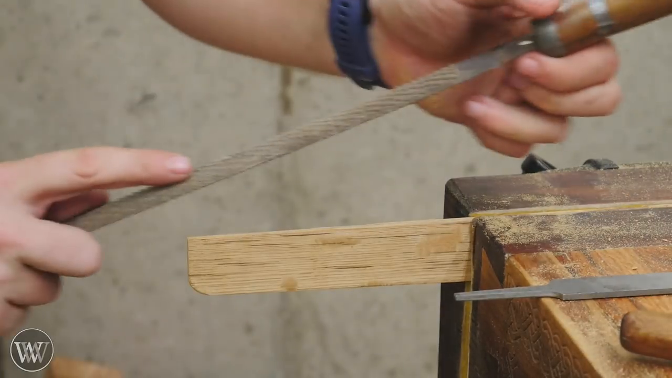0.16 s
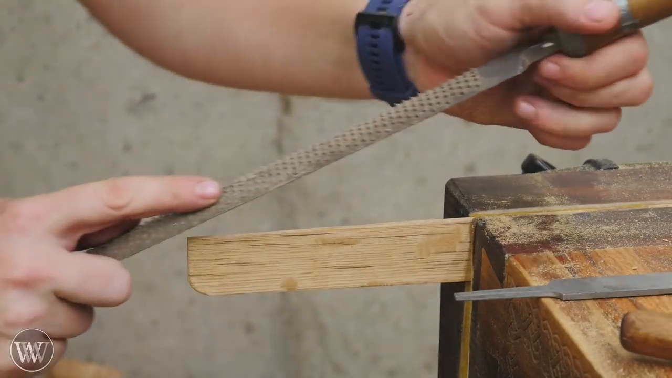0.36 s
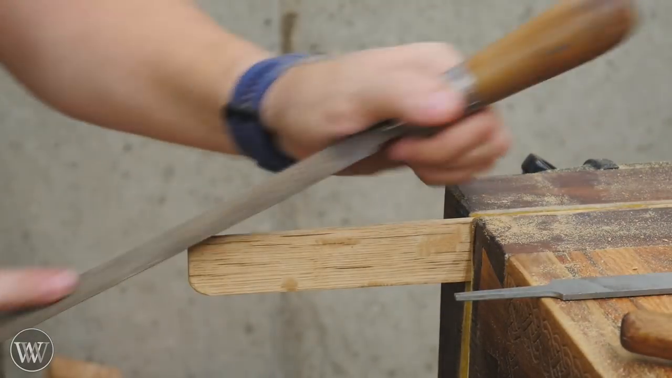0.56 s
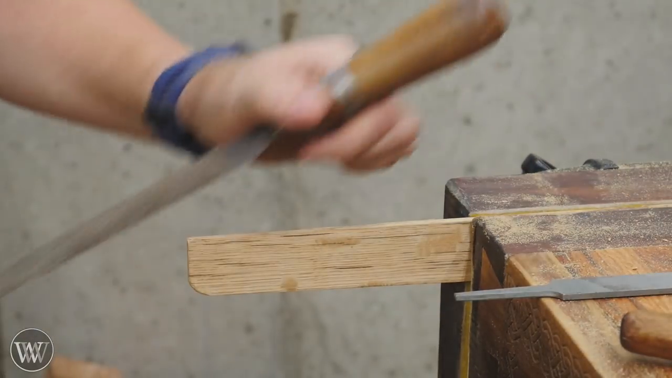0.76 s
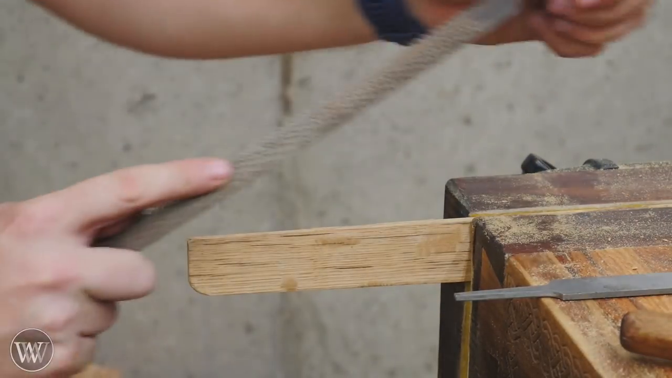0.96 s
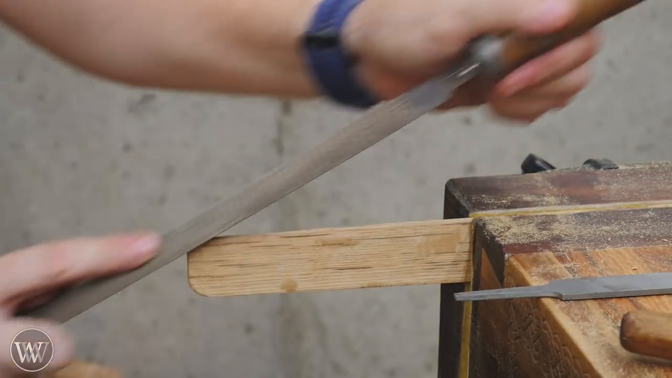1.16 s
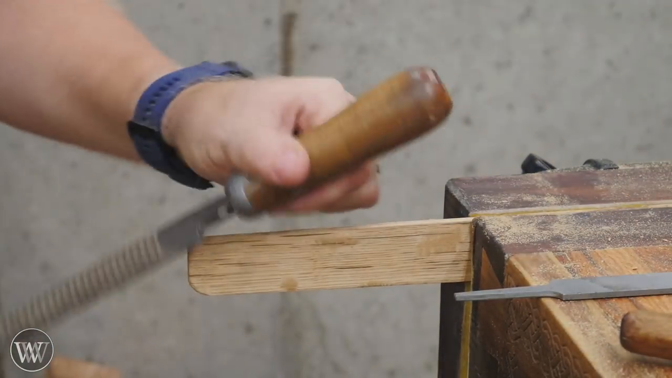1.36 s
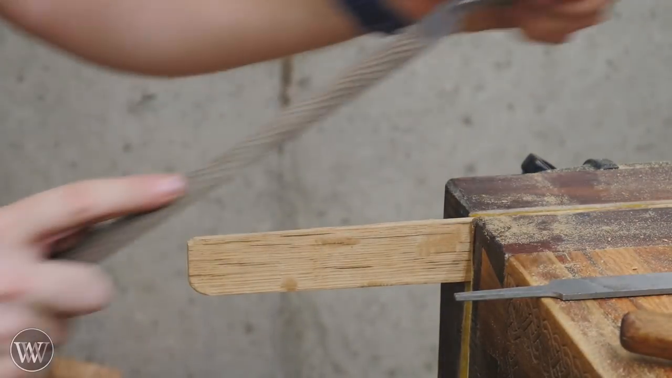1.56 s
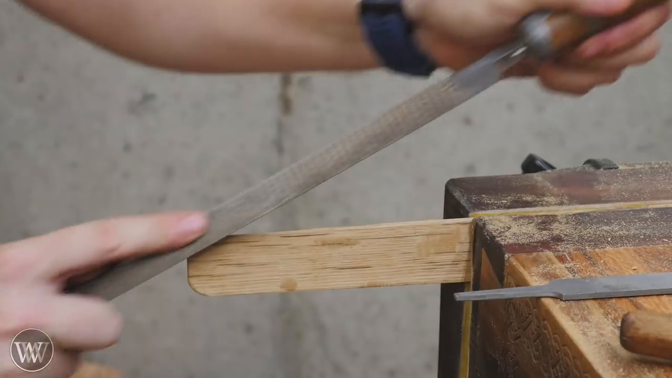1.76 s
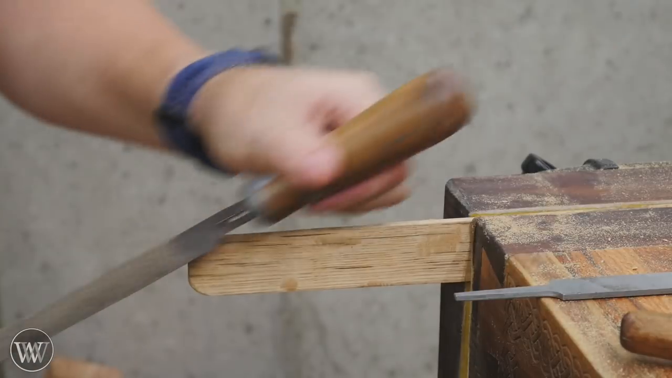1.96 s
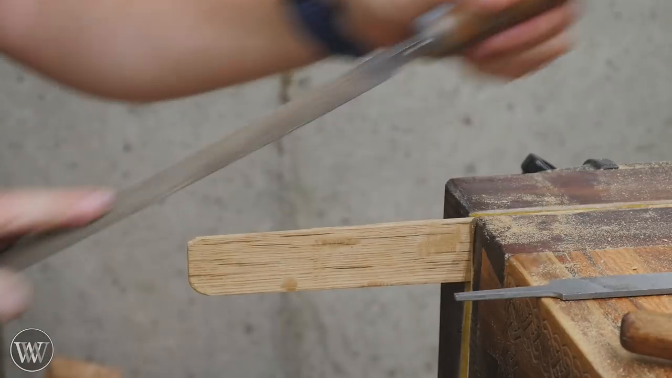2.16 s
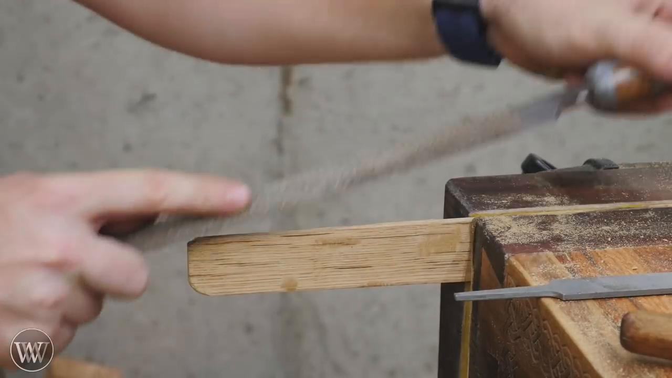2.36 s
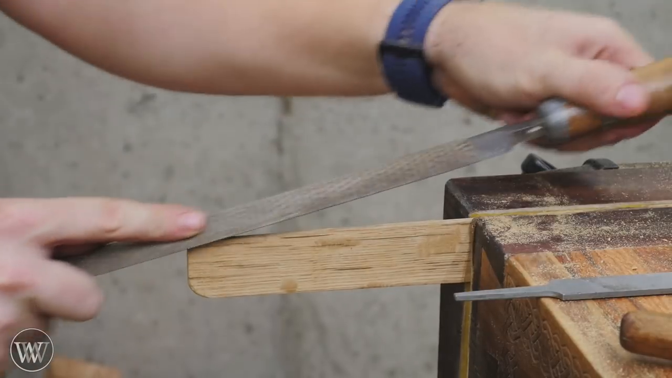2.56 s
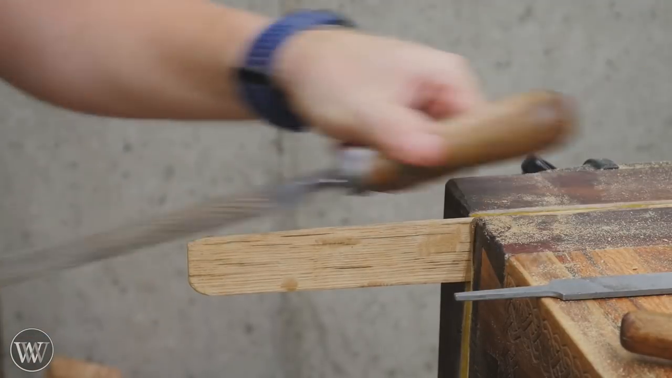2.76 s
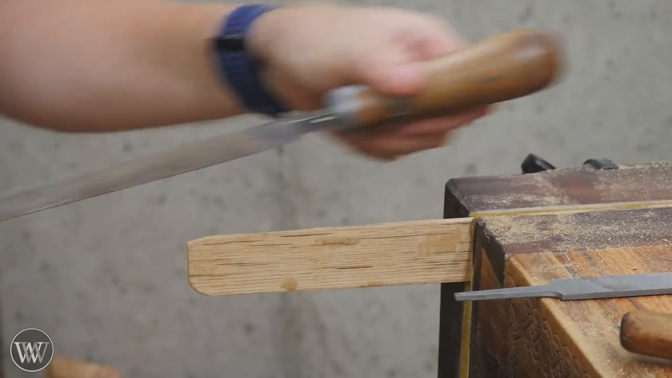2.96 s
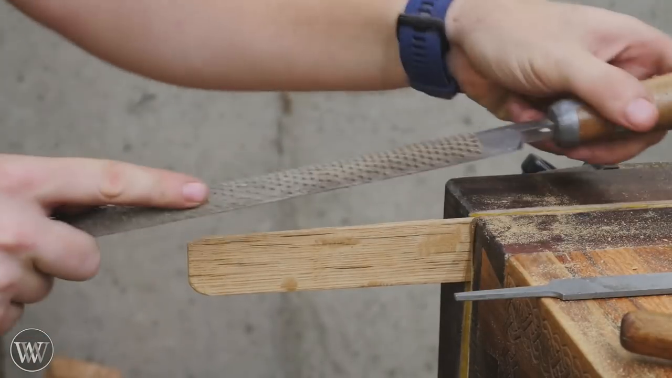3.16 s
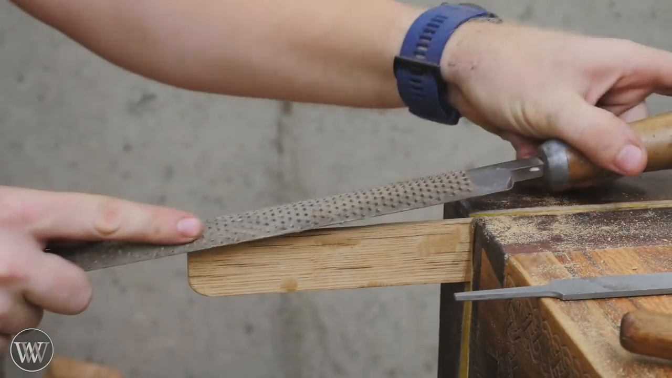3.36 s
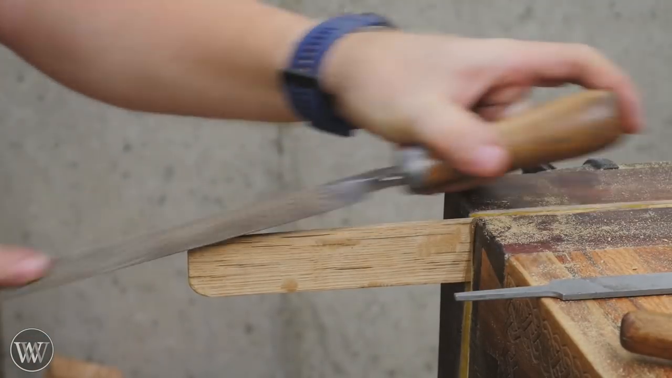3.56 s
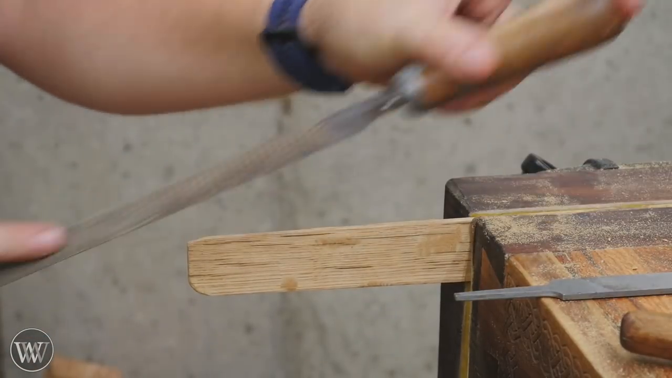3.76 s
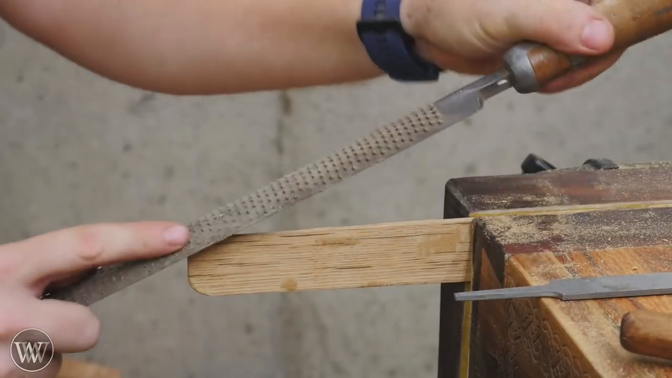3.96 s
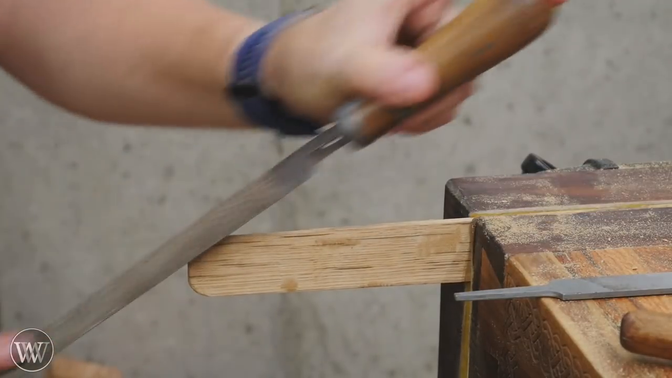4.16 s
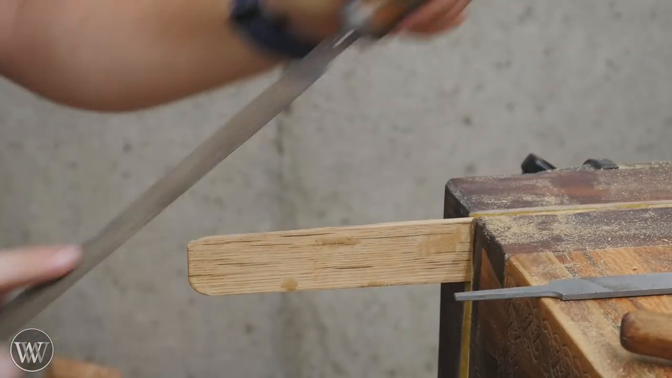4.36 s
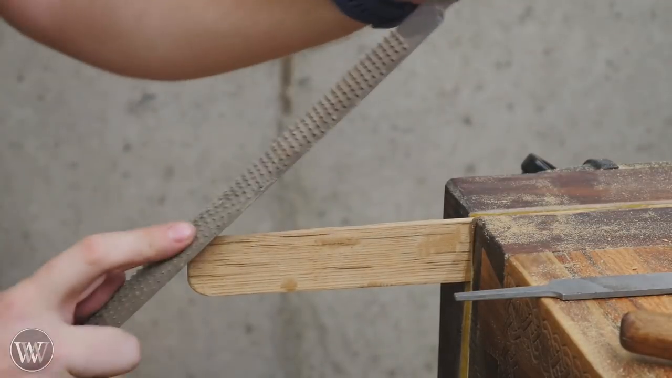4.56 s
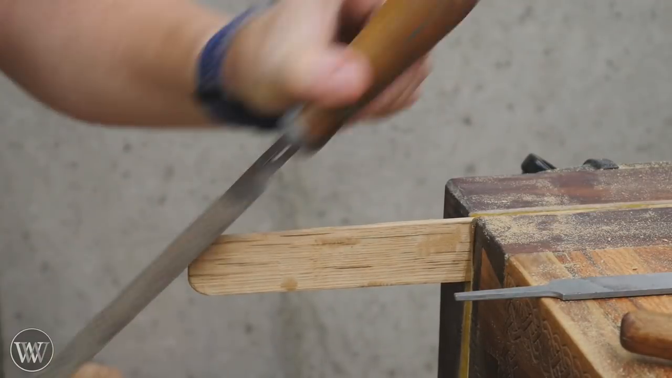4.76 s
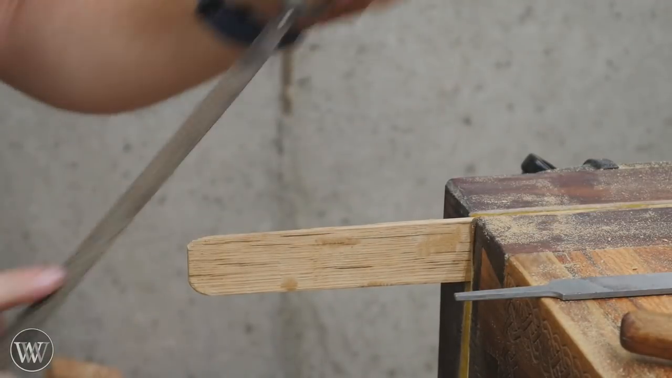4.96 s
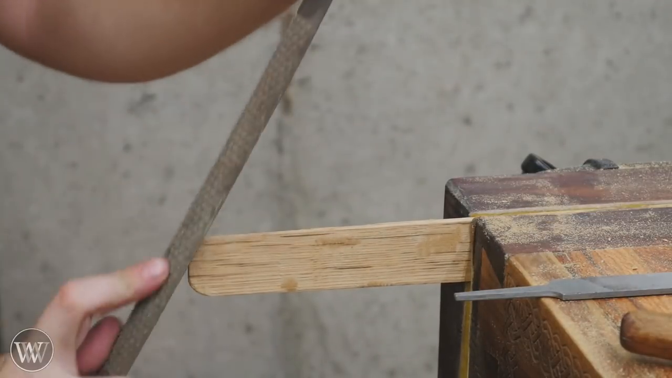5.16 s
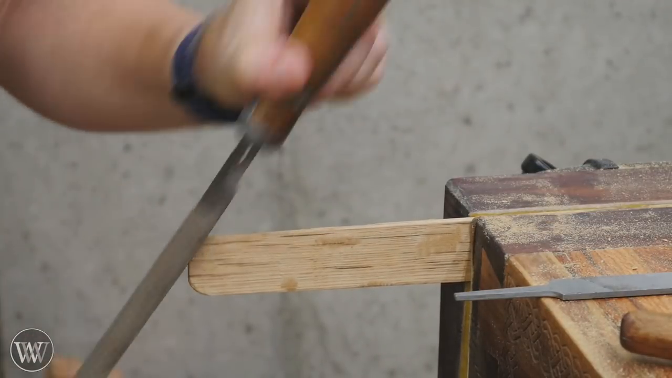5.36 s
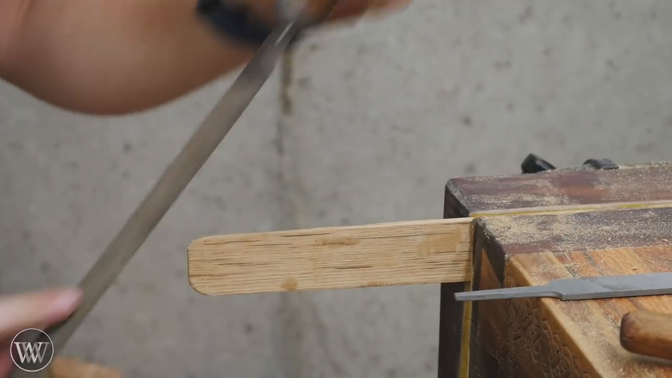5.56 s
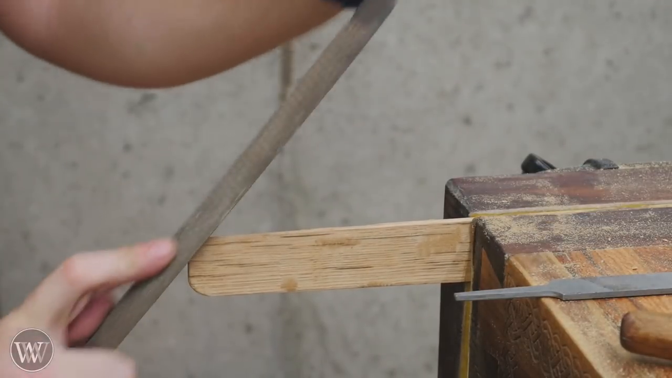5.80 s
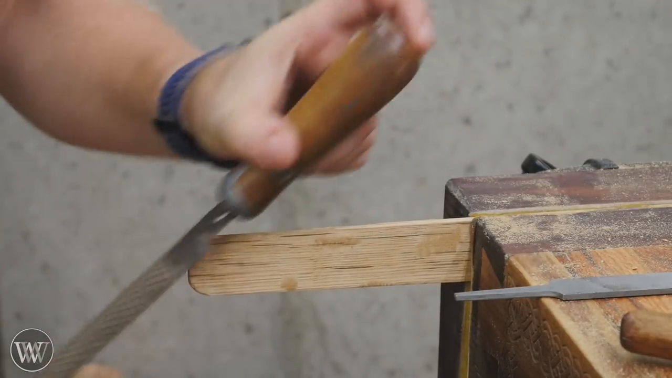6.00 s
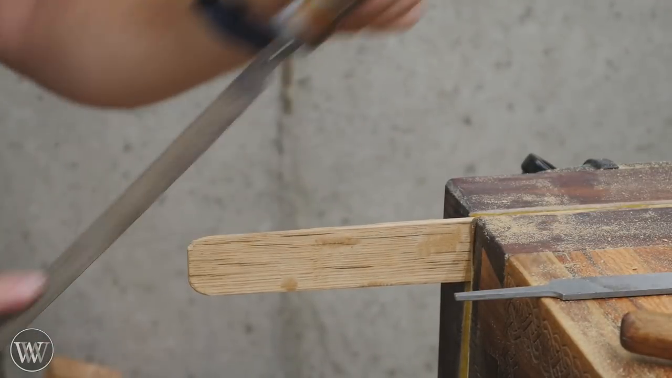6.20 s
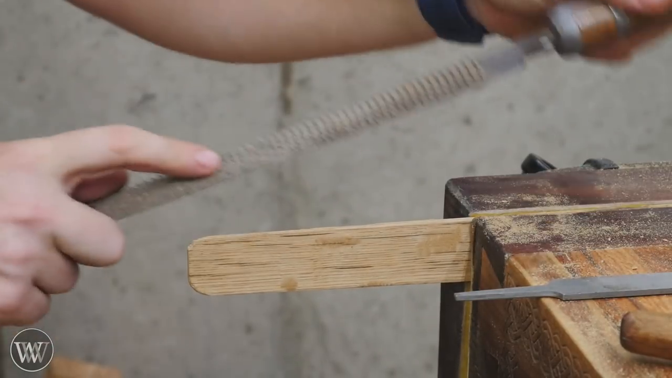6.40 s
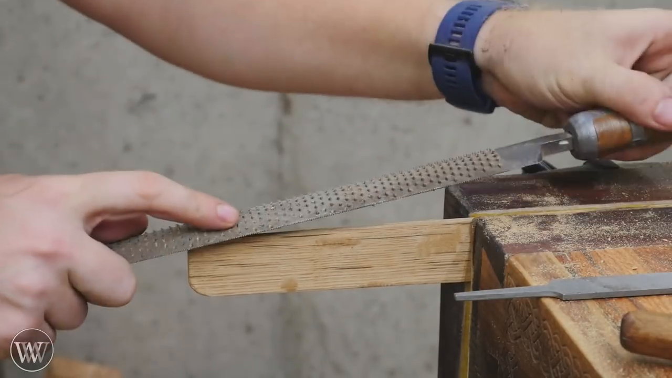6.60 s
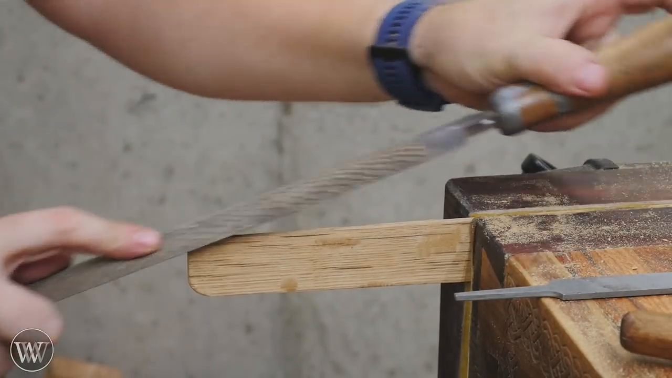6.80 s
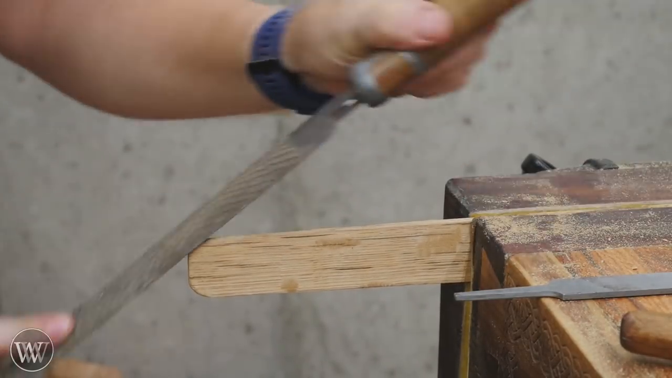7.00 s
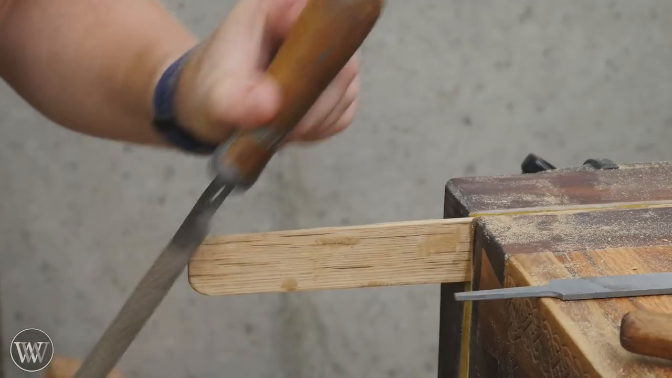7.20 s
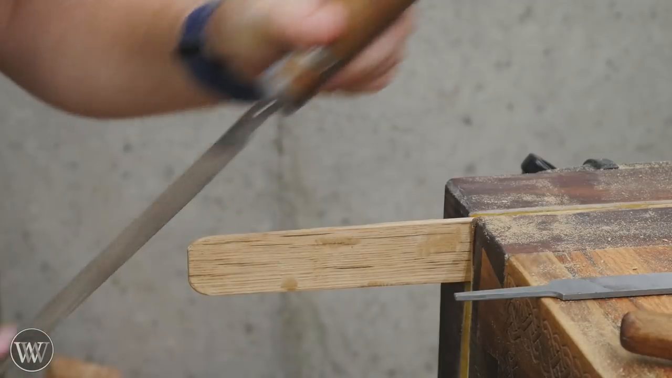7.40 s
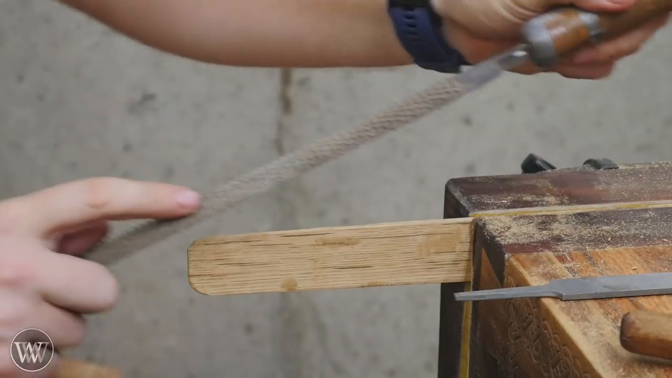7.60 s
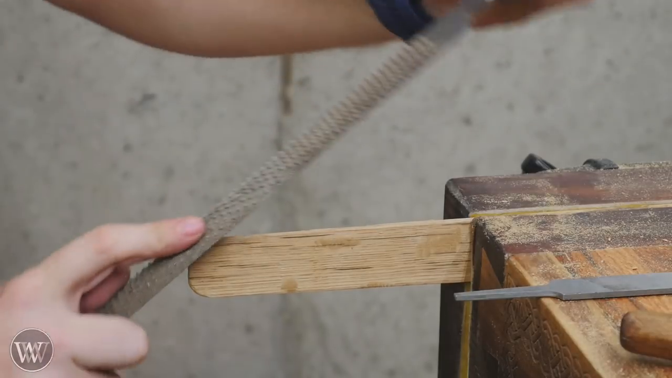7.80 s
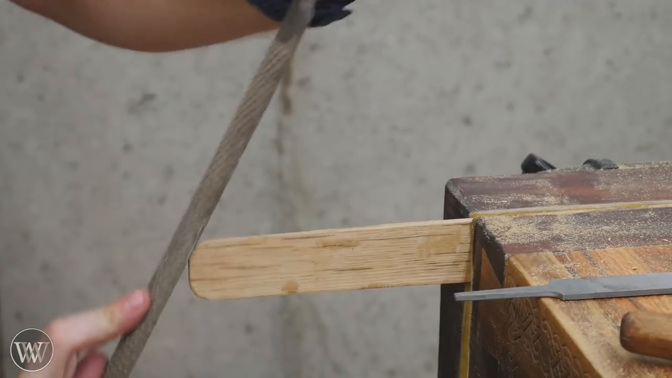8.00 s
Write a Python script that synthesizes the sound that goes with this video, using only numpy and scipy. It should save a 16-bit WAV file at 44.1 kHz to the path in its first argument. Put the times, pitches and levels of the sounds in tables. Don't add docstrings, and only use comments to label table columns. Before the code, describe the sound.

Close in a small workshop, coarse steel teeth grind over the end of a thin wood strip held to a bench. Strokes vary from faint scuffs to loud, knocking bites, most starting with a tap and several ending in a brief woody boing. Between them are soft hand slides, dull bench bumps and dry ticks over faint hiss and low rumble. A cloth brush on the microphone precedes the final rasp.

```python
import sys
import numpy as np
from scipy import signal
from scipy.fft import rfft, irfft, next_fast_len
from scipy.io import wavfile
from scipy.ndimage import uniform_filter1d, map_coordinates

SR = 44100
rng = np.random.default_rng(int(sys.argv[2]) if len(sys.argv) > 2 else 0)


def dump(signal):
    limited = np.clip(np.atleast_2d(signal).T, -1, 1)
    pcm = np.round(limited * 32767).astype(np.int16)
    wavfile.write(sys.argv[1], SR, pcm)


def how_loud(loudness_db):
    steps = np.asarray(loudness_db, float) / 20
    return 10 ** steps


N = 354637

STRIP, STEEL, BENCH, BENDING = range(4)


def unit(x):
    return x / np.sqrt(np.mean(x ** 2) + 1e-20)


def along(points, hz):
    f, v = np.transpose(points)
    return np.interp(np.log(hz + 1), np.log(f + 1), v)


def wobble(rate):
    knots = rng.standard_normal(int(N * rate / SR) + 4)
    return map_coordinates(knots, [np.arange(N) * rate / SR])


def swell(start, top, end, edge_db):
    t = np.arange(N) / SR
    return -edge_db * np.maximum((top - t) / (top - start), (t - top) / (end - top))


def filtered(x, response):
    m = next_fast_len(N + SR // 2)
    return irfft(rfft(x, m) * response(np.fft.rfftfreq(m, 1 / SR)), m)[..., :N]


def noise(spectrum):
    return unit(filtered(rng.standard_normal(N), lambda hz: how_loud(along(spectrum, hz))))


def body(modes):
    def ring(f):
        total = 0
        for k, (centre, width, db) in enumerate(modes):
            damping = 1j * f * width
            total = total + (-1) ** k * how_loud(db) * damping / (centre * centre - f * f + damping)
        return total

    scale = np.sqrt(np.mean(np.abs(ring(np.arange(1, SR // 2, 2))) ** 2))
    return lambda f: ring(f) / scale


def air():
    # frequency_hz, density_db
    hiss_spectrum = [(90, -8), (260, -16), (490, -14), (820, -28), (3200, -31), (13300, -34), (16000, -37)]
    # frequency_hz, density_db
    rumble_spectrum = [(18, -11), (34, -7.5), (52, 7.5), (80, -1.5), (110, -23), (200, -120)]
    # peak_s, peak_db, dying_s
    shudders = [(.02, -41, 0.093), (.55, -43.5, 0.38), (.8, -37, 0.1), (1.17, -37, 0.23), (1.9, -42, 0.17),
                (2.45, -49, .1), (2.64, -42, 0.17), (3.4, -47.5, 0.67), (4.2, -52, 0.18), (4.68, -45, .15),
                (5.27, -57, .3), (5.87, -50, .4), (6.922, -44, 0.42), (7.17, -42, 0.11), (7.57, -42, 0.28),
                (8.0, -42, .2)]
    rise = 0.564
    shake = sum(how_loud(db + swell(s - rise * dying, s, s + dying, edge_db=14.5)) for s, db, dying in shudders)
    rumble = (how_loud(-62) + shake) * how_loud(0.5 * wobble(6)) * noise(rumble_spectrum)
    return rumble + how_loud(-54 + wobble(3)) * noise([(60, -40), *hiss_spectrum])


def shop(x, count=14):
    # frequency_hz, t60_s
    decay = [(100, 0.089), (400, 0.46), (2000, 0.43), (5000, 0.45), (12000, 0.59)]
    hz, t, z = signal.stft(rng.standard_normal((count, int(.7 * SR))), SR, nperseg=256)
    tails = signal.istft(z * how_loud(-60 * t / along(decay, hz)[:, None]), SR, nperseg=256)[1]
    out, step = np.zeros(N + 2 * SR), N // count + 1
    for k, tail in enumerate(tails):
        echo = signal.fftconvolve(x[k * step:(k + 1) * step], tail / np.linalg.norm(tail))
        out[k * step + 300:][:len(echo)] += echo
    room_hz = 3800
    return filtered(out[:N], lambda f: 1 / (1 + 1j * f / room_hz))


def ticks():
    # start_s, peak_db, centre_hz, crack_db
    tick_events = [(0.8144, -32, 1370, -15), (0.8989, -41, 1790, -13), (0.9344, -40, 1550, -16),
                   (0.9594, -43, 2660, -15), (1.5924, -38, 1900, -19), (1.6432, -19, 1660, -16),
                   (2.2353, -27, 1750, -14), (3.0844, -25, 5180, -19), (3.9094, -41, 4680, -11),
                   (3.9609, -29, 1730, -23), (7.5572, -28, 2620, -13)]
    out, t = np.zeros(N), np.arange(SR // 100) / SR
    dying = -60 * t / .005
    for s, db, hz, crack_db in tick_events:
        crack = rng.standard_normal(len(t)) * how_loud(crack_db + 10 + dying)
        ring = how_loud(dying) * np.sin(2 * np.pi * hz * t)
        out[round(s * SR):][:len(t)] += how_loud(db) * (ring + crack)
    return filtered(out, lambda hz: 1j * hz / (1000 + 1j * hz))


def rustle():
    # frequency_hz, density_db
    cloth_spectrum = [(18, -34), (30, -15), (81, 1), (210, -2), (439, -18.5), (500, -27), (650, -59),
                      (1100, -120)]
    start_s, end_s, rise_s, hit_db = 7.489, 7.73, 0.02, -23
    t = np.arange(N) / SR - start_s
    hit = hit_db - 202 * t
    drag = -31.5 - 54 * t
    level = np.minimum(np.maximum(hit, drag), hit_db)
    gate = np.clip(1 + t / rise_s, 0, 1) * np.clip((end_s - start_s - t) / rise_s, 0, 1)
    return gate * how_loud(level + 2.3 * wobble(45)) * noise(cloth_spectrum)


def hand():
    # frequency_hz, density_db
    skin_spectrum = [(300, -55), (590, -15), (1000, 0.5), (2200, -6.5), (5500, -2.5), (7100, -5.5),
                     (14600, -2.5), (16000, -15)]
    # start_s, fastest_s, stop_s, level_db
    slides = [
        (0.255, .285, 0.34, -40),
        (.36, 0.464, 0.61, -55.5),
        (0.877, .94, 1.029, -56.5),
        (1.553, 1.61, 1.686, -56),
        (3.05, 3.13, 3.25, -63),
        (.69, 0.774, 0.83, -44),
        (2.805, 2.878, 2.953, -44),
        (7.26, 7.4, 7.5, -50),
    ]
    # start_s, peak_db, pitch_hz, t60_s, overtone_spread_ratio
    bumps = [(0.034, -12, 345, 0.15, 1.15), (0.044, -7, 344.6, 0.12, 1.6), (0.281, -25, 222, 0.18, 1.47),
             (0.363, -21.5, 284, 0.092, 1.22), (0.416, -31.5, 248, 0.16, 0.98),
             (0.495, -35.5, 305, 0.19, 1.09), (3.381, -32, 210, 0.15, 0.99), (5.26, -14.5, 362, 0.21, 0.74),
             (5.776, -25, 239, 0.17, 1.2), (4.328, -25, 347.9, 0.095, 0.93), (4.4, -41.5, 289.4, 0.9, 1.0),
             (4.498, -40, 275, 0.27, 1.55)]
    speed = sum(how_loud(db + swell(start, top, stop, edge_db=11.5)) for start, top, stop, db in slides)
    out = speed * how_loud(5.5 + 1.0 * wobble(24)) * noise(skin_spectrum)
    t = np.arange(SR // 4) / SR
    for s, db, hz, t60, spread in bumps:
        main = how_loud(-60 * t / t60) * np.sin(2 * np.pi * hz * t)
        cluster = np.zeros(len(t))
        for _ in range(9):
            ratio = 1 + spread * rng.random()
            fall = how_loud(rng.normal(0, 3.0) - 8 - 60 * t / t60)
            cluster += fall / ratio * np.sin(2 * np.pi * (hz * ratio * t + rng.random()))
        onset = 1 - np.exp(-t / 0.0013)
        out[round(s * SR):][:len(t)] += how_loud(db - 5.5) * onset * (main + cluster)
    return out


def spring():
    # start_s, peak_db, pitch_hz, t60_s, upper_mode_db
    releases = [(0.63, -18.5, 371.7, 0.21, -10.5), (1.399, -16.5, 370.4, 0.22, -1.5),
                (2.04, -21.5, 366.4, 0.24, -2), (2.829, -20.5, 367, 0.2, -27),
                (3.679, -17.5, 373, 0.22, -13), (4.259, -15.5, 369.7, 0.23, -23),
                (4.819, -16, 383, 0.21, -3), (5.417, -12.5, 369.7, 0.25, -8.5), (6.03, -20.5, 364, 0.28, 2),
                (7.189, -11.5, 363.4, 0.25, -18), (7.24, -14.5, 371, 0.18, -38)]

    def tone(hz, phase):
        return np.sin(2 * np.pi * (hz * t + phase))

    out, t = np.zeros(N + SR), np.arange(SR // 2) / SR
    for s, db, hz, t60, upper_db in releases:
        phase = rng.random(3)
        low = tone(hz, 0) + 0.71 * tone(hz * 1.06, phase[0])
        low += 0.28 * sum(tone(hz * (1.33 + 0.122 * rng.random()), p) for p in phase)
        upper = .5 * sum(tone(1890 * (1 + .035 * rng.standard_normal()), rng.random()) for _ in range(6))
        swing = how_loud(-3.0 - 60 * t / t60) * low + how_loud(upper_db - 6.5 - 60 * t / 0.26) * upper
        out[round(s * SR):][:len(t)] += how_loud(db) * (1 - np.exp(-t / 0.0036)) * swing
    return out[:N]


def bites(per_s, spread_db, clump_db):
    hit = rng.random(N) < per_s / SR
    size_db = spread_db * np.minimum(rng.exponential(size=N), 4.2) + clump_db * wobble(160)
    return unit(hit * how_loud(size_db) * rng.standard_normal(N))


def patches(x, patchy_db):
    z = signal.stft(x, nperseg=512)[2]
    field = uniform_filter1d(rng.standard_normal(z.shape), 4, 0)
    field = uniform_filter1d(field, 9, 1)
    return signal.istft(z * how_loud(patchy_db * unit(field)), nperseg=512)[1][:N]


def pressure(part, lift_db_per_s):
    # touch_s, grip_s, lift_s, grip_db, lift_db
    strokes = [(-.03, 0.026, 0.32, -37, -46), (0.548, 0.571, 0.6, -19, -22.5),
               (1.141, 1.166, 1.37, -20, -21.5), (1.752, 1.768, 1.78, -34.5, -28.5),
               (1.773, 1.865, 2.015, -19, -23), (2.548, 2.62, 2.696, -35, -30),
               (2.7, 2.725, 2.79, -32.5, -32.5), (3.435, 3.503, 3.663, -37, -29),
               (4.032, 4.072, 4.1, -46.5, -36), (4.097, 4.128, 4.2, -25.5, -18.5),
               (4.64, 4.72, 4.83, -20, -24), (5.257, 5.299, 5.4076, -20.5, -22.5),
               (5.815, 5.9, 5.97, -22, -18), (6.719, 6.817, 7.12, -32.5, -31),
               (7.09, 7.154, 7.225, -27, -26), (7.876, 7.903, 8.12, -29.5, -18)]
    # steel_db, bench_db, bending_db
    angles = [(3.5, 0.5, -2.5), (-0.5, -1, 2.5), (-1, -3.5, 0.2), (0, -11, -3), (-1.5, -5.5, -0.9),
              (4, 2.5, 0.5), (5.5, 2, -0.2), (2, 0.5, -0.5), (6, 2, 0.5), (1, -4, 0), (0.7, 0, 5.5),
              (-4, -3, 3.5), (-0.5, -3, 1.5), (-0.1, -0.3, -2), (1.5, 1.5, 2), (-0.9, -2, 2)]
    # strip_db, steel_db, bench_db, bending_db
    load_shift = (1.5, -0.5, 0, 2)
    half_shift = load_shift[part] / 2
    t, gain = np.arange(N) / SR, np.zeros(N)
    for (touch, grip, lift, grip_db, lift_db), angle in zip(strokes, angles):
        build = np.clip((t - touch) / (grip - touch), 0, 1) ** 1.16
        db = np.interp(t, [grip, lift], [grip_db - half_shift, lift_db + half_shift])
        db = db - lift_db_per_s * np.maximum(t - lift, 0)
        share_db = (0, *angle)[part]
        gain = np.maximum(gain, build * how_loud(db + share_db))
    return gain * how_loud(.8 * wobble(22))


def rasp():
    # centre_hz, width_hz, level_db
    strip_modes = [(810, 147, -6.5), (1058, 57, -1.5), (1225, 88, -2.5), (1336, 49, 0), (1557, 92, -2),
                   (1793, 78, -0.5), (1980, 33, -5), (2091, 19, 2), (2200, 670, -9.5)]
    # centre_hz, width_hz, level_db
    bending_modes = [(480.2, 34.3, -1.5), (536.7, 13, -4), (632, 41, -4), (696, 33.6, -2.5)]
    # centre_hz, width_hz, level_db
    bench_modes = [(131.4, 24, -6), (226.5, 28, -1.5), (298, 86, -8), (355.5, 24.5, 1.5)]
    # centre_hz, width_hz, level_db
    steel_modes = [(3514, 634, -5.5), (4340, 244, -3.5), (4566, 203, -3), (5380, 610, -7),
                   (6620, 1800, -11.5), (8920, 1460, -13), (10350, 1600, -15.5), (13200, 450, -40),
                   (13500, 1300, -35)]
    # centre_hz, width_hz, level_db
    blade_modes = [(3516, 68, 0)]
    # centre_hz, width_hz, level_db
    knock_modes = [(234, 36, 4), (415, 91, -4), (660, 106, -2.5), (850, 59, -2), (1193, 170, -5),
                   (1740, 157, -3.5), (2156, 410, -10)]
    # centre_hz, width_hz, level_db
    thud_modes = [(127, 28, 0)]
    # start_s, peak_db, wood_knock_db, contact_s
    landings = [(0.5556, -14.5, -5, 0.091), (1.1511, -15, -2.5, 0.052), (1.7523, -23, -0.5, 0.062),
                (2.4508, -29.5, 1, 0.12), (3.337, -40, -2.5, 0.15), (3.3679, -37, -4, 0.15),
                (4.0109, -35.5, -0.5, 0.22), (4.584, -37, 2, 0.06), (4.59, -29, -2, 0.1),
                (5.229, -40, 6, 0.074), (5.241, -25.5, -3.5, 0.099), (5.778, -39, 2, 0.13),
                (6.6172, -33.5, -1, 0.27), (7.723, -31, 1.5, 0.04), (7.727, -19.5, 0.7, 0.078),
                (7.844, -39, -14, 0.22), (7.857, -26.5, -5.5, 0.1)]
    # start_s, peak_db, wood_knock_db, contact_s
    taps = [(0.604, -9, -10, 0.02), (2.7796, -22, -10, 0.02), (2.814, -20, -3, 0.026),
            (2.8474, -32.5, 5, 0.023), (3.6159, -13.5, -5, 0.028), (4.1185, -17, 2, 0.019),
            (4.653, -30, 14.5, 0.026), (4.6836, -12.5, -3, 0.017), (5.2822, -15, 5, 0.023),
            (5.313, -29, -3, 0.017), (5.3259, -9, -32, 0.022), (5.3585, -6.5, -3, 0.017),
            (5.8959, -3.5, -23, 0.042), (6.8155, -4.5, -12.5, 0.019), (7.0706, -12, -7, 0.024),
            (7.112, -5, -18, 0.018), (7.145, -3, -28, 0.026), (7.8936, -15.5, -4.5, 0.019),
            (7.9246, -2.5, -23, 0.022), (7.9958, -7.5, -2.5, 0.024)]

    teeth = patches(bites(4000, spread_db=2.5, clump_db=1.5), patchy_db=0.5)
    dust = unit(teeth + patches(bites(12000, spread_db=0.5, clump_db=1.5), patchy_db=4.5))
    tick, knock = np.zeros(N), np.zeros(N)
    t = np.arange(SR // 25) / SR
    for s, db, knock_db, contact in landings + taps:
        a = round(s * SR)
        crack = rng.standard_normal((2, len(t)))
        tick[a:a + len(t)] += how_loud(db - 4.5 - 60 * t / (0.27 * contact)) * crack[0]
        knock[a:a + len(t)] += how_loud(db + knock_db - 60 * t / contact) * crack[1]
    hard = filtered(tick, lambda f: 1.35 / (1 + 1j * f / 8000) ** 2)

    strip = filtered(how_loud(-0.5) * pressure(STRIP, lift_db_per_s=222) * teeth, body(strip_modes))
    bending = filtered(how_loud(-3.5) * pressure(BENDING, lift_db_per_s=206) * teeth, body(bending_modes))
    bench = filtered(how_loud(-3.0) * pressure(BENCH, lift_db_per_s=161) * teeth, body(bench_modes))
    steel = filtered(how_loud(-2.0) * pressure(STEEL, lift_db_per_s=426) * dust + hard, body(steel_modes))
    blade = how_loud(-21) * filtered(pressure(STEEL, lift_db_per_s=426) * dust, body(blade_modes))
    wood = filtered(knock, body(knock_modes)) + how_loud(-10) * filtered(knock, body(thud_modes))
    return strip + bending + bench + steel + blade + wood


def scene():
    # frequency_hz, side_minus_mid_db
    shadow_spectrum = [(30, -19), (90, -23), (180, -27), (350, -29), (1650, -25), (4970, -19), (15000, -14)]
    near = rasp() + spring() + hand()
    dry = ticks()
    mid = near + how_loud(-4.5) * shop(near + .4 * dry) + dry + rustle() + air()
    hz, _, z = signal.stft(mid, SR, nperseg=512)
    spin = np.exp(2j * np.pi * rng.random(z.shape))
    side = signal.istft(z * spin * how_loud(along(shadow_spectrum, hz))[:, None], SR, nperseg=512)[1][:N]
    return np.array([mid + side, mid - side])


def roll_off(x):
    return signal.sosfilt(signal.butter(12, 16490, fs=SR, output="sos"), x)


def record(dry):
    soft = dry / (1 + np.abs(dry / .9) ** 4) ** .25
    mix = filtered(soft, lambda hz: 1 / (1 + (hz / 15800) ** 80))
    return roll_off(mix)


dry = scene()
out = record(dry)
dump(out)
```